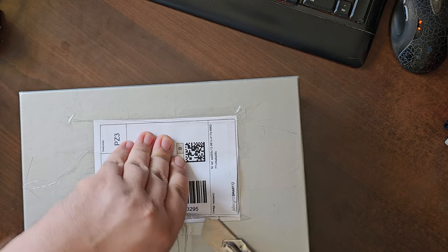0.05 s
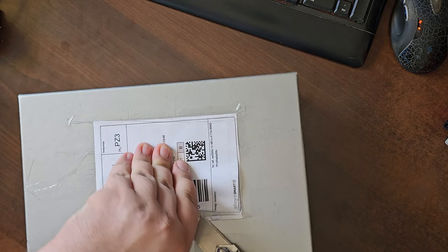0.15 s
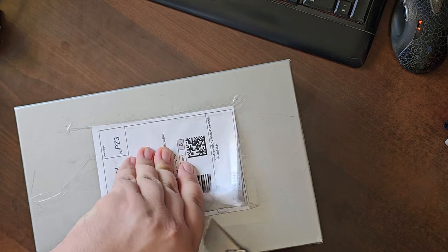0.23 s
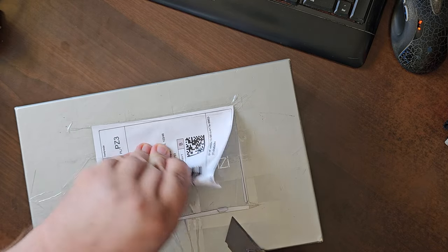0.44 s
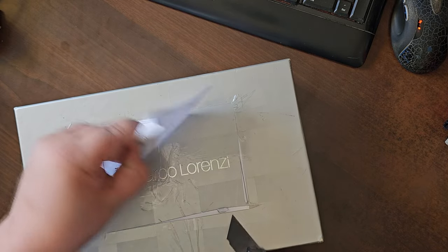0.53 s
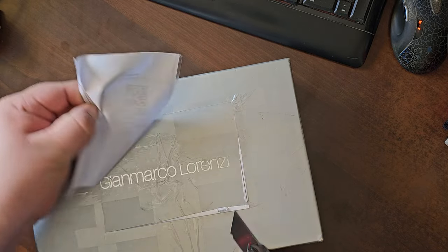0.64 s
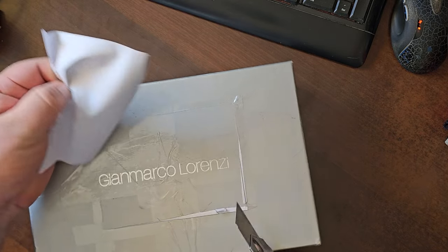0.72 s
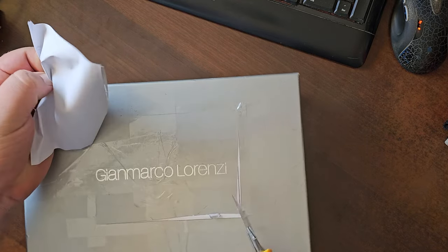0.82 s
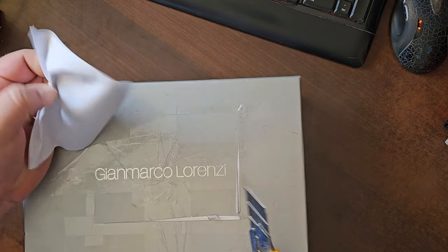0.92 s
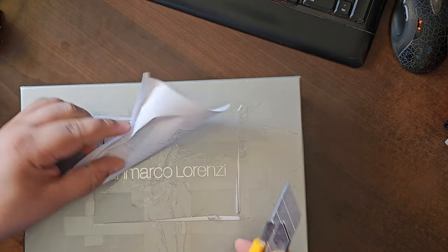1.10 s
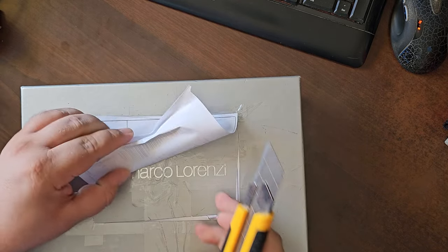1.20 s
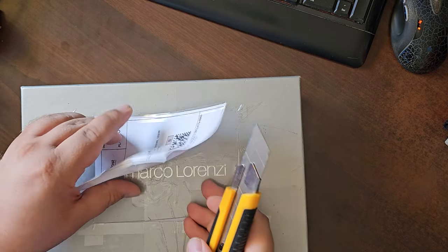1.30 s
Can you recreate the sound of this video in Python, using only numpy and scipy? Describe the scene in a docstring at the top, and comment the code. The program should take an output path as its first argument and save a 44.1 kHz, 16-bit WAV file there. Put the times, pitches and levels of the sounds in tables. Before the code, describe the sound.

A sticky paper label rips off a hollow cardboard box in quick, crackling snaps, close up

```python
"""Peeling a label off a cardboard box

A sticky paper label comes off a box on a desk, close under a small stereo microphone. The glue lets go
in sharp snaps: noise bursts that ring the stiff paper, each with a bright tick. Knocks thud on the hollow
box as a sum of decaying modes; the sheet rustles and crackles as random grains through paper, fizz and box.
A small room answers with a sparse decaying tail, over a quiet floor of noise with low rumble."""
import sys
import numpy as np
from scipy import signal
from scipy.fft import rfft, irfft
from scipy.io import wavfile

SR = 44100
rng = np.random.default_rng(int(sys.argv[2]) if len(sys.argv) > 2 else 0)


def magnitude_from_level(level_db):
    """Linear magnitude for a level in decibels (20 dB per decade)."""
    exponent = np.asarray(level_db, float) / 20
    return 10 ** exponent


def master(y):
    """Save y as 16-bit WAV."""
    cut = np.clip(np.atleast_2d(y).T, -1, 1)
    pcm = np.round(cut * 32767)  # scale
    wavfile.write(sys.argv[1], SR, pcm.astype(np.int16))


N = 59535  # samples

# spectrum of the sheet's middle voice: f/Hz, level/dB
PAPER_VOICE = [(290, -50.5), (500, -21.5), (850, -14.5), (1150, -14), (1200, -5.5), (1470, -10.5),
               (2380, -9.5), (3960, -6), (6000, -13), (7800, -17.5), (13200, -120)]
# spectrum of the sheet's treble: f/Hz, level/dB
FIZZ_VOICE = [(400, -56), (2000, -33), (3800, -6), (6500, -2.5), (10500, -1), (13500, -1.5), (15500, -6),
              (16500, -9)]
BALANCE_DB = 1.5  # left over right, for the knocks and the floor


def evened(x):
    """Scales a signal to an rms of 1."""
    return x / np.sqrt(np.mean(x ** 2) + 1e-20)


def peak(x):
    """Scales a signal to a peak of 1."""
    return x / abs(x).max()


def read(points, hz):
    """Reads a curve of (f/Hz, value) points along a logarithmic frequency axis."""
    f, value = np.transpose(points)
    return np.interp(np.log(hz + 1), np.log(f + 1), value)


def left_right(difference):
    """Splits a left-minus-right difference evenly over the two ports."""
    return np.array([[difference], [-difference]]) / 2


def place(x, pan_db, lag):
    """Two microphone ports: a level difference and a small delay in samples, on top of 8 for both."""
    n = len(x) + 32
    turn = np.exp(-2j * np.pi * np.fft.rfftfreq(n) * (8 + left_right(lag)))
    return irfft(rfft(x, n) * turn, n) * magnitude_from_level(left_right(pan_db))


def colour(points):
    """Causal filter of energy 1 with the given spectrum, its phase derived from the log gain."""
    level_db = np.maximum(read(points, abs(np.fft.fftfreq(2048, 1 / SR))), -60)
    log_gain = np.log(magnitude_from_level(level_db))
    taps = np.fft.ifft(np.exp(np.conj(signal.hilbert(log_gain)))).real[:1024]
    starts_strong = abs(taps[:50]).sum() > abs(taps[-50:]).sum()
    taps = taps if starts_strong else taps[::-1]
    return taps / np.linalg.norm(taps)


def snaps():
    """Each snap of glue or creasing paper: a short burst rings one patch of paper, with a bright tick."""
    # breaks of the glue and creases: t/s, length/ms, ring level/dB, ring f/Hz, tick level/dB
    breaks = [(0.059, 6.4, -41, 1220, -40), (0.135, 5.5, -43, 1300, -34), (0.2255, 3.5, -22, 2880, -44),
              (0.2316, 0.33, -17, 1290, -8), (0.2325, 0.34, -23, 2820, -2.5),
              (0.234, 2.33, -17, 2720, -8.5), (0.242, 2.2, -18.5, 4370.0, -30),
              (0.407, 2.4, -22, 1550, -23), (0.4112, 0.67, -12, 3300, -9), (0.4193, 0.21, -14, 1310, 6),
              (0.4212, 0.95, -18.5, 1670, -1.5), (0.4268, 0.88, -18.5, 3340, -32),
              (0.441, 2.7, -24, 960, -29), (0.4747, 2.4, -17, 3150, -23), (0.4901, 1.54, -18, 900, -45),
              (0.504, 6.7, -25, 1140, -20), (0.5793, 1.5, -23, 2590, -23), (0.5997, 1.7, -17.5, 1720, -44),
              (0.6021, 0.87, -15.5, 1740, -14), (0.6143, 1.5, -23, 1750, -21), (0.6257, 1, -13, 1700, -9),
              (0.6305, 0.44, -13, 1570.0, -22), (0.641, 0.74, -16.5, 1900, -9),
              (0.6456, 0.6, -13, 1530, -6), (0.6514, 0.33, -9, 1540, -2), (0.653, 3, -23, 1440, -15),
              (0.6533, 0.72, -12, 1410, -7), (0.658, 0.72, -10.5, 1580, -1.5), (0.6605, 0.7, -9, 3520, -6),
              (0.678, 1.4, -18, 1450, -12), (0.7155, 0.85, -12, 1470, -35.5), (0.7186, 1.7, -28, 2080, -12),
              (0.7259, 0.93, -23, 2390.0, -11.5), (0.7515, 2, -34, 1300, -46), (0.783, 3.5, -27, 4560, -25),
              (0.89, 7.6, -33, 1300, -41), (0.916, 4.2, -24, 1330, -36), (0.921, 6.5, -28, 1970, -36),
              (0.945, 4.6, -28.5, 1160.0, -50), (0.978, 3.7, -32, 2920, -37), (1.017, 2.9, -43, 920, -66),
              (1.046, 12, -32, 833, -54), (1.063, 6.3, -31.5, 1480, -37), (1.098, 3.2, -29.5, 1610.0, -46),
              (1.251, 2.6, -28, 1265, -39), (1.272, 2.7, -35, 1580, -47.5), (1.283, 2.5, -33.5, 1710, -32),
              (1.3287, 1.6, -38.5, 905, -48)]
    rise_share, release = 0.067, 2.74  # rise as a share of the length; strength of the first break
    ring_q, wide_db = 5.9, -1.5  # resonance of the patch; whole-sheet colour against the ring
    pan_db, pan_spread_db, lag_spread = 0.7, 1.1, 2.81  # lag in samples
    out, t = np.zeros((2, N + 1000)), np.arange(800) / SR
    paper, fizz = colour(PAPER_VOICE), colour(FIZZ_VOICE)
    for s, ms, ring_db, hz, tick_db in breaks:
        burst, tick, spread = rng.standard_normal((3, 800))
        u = t * 1e3 / ms
        shape = np.minimum(u / rise_share, 1) * np.exp(-u ** 2)
        # a one-sided push of about 0.1 ms as the glue lets go
        first_break = release / max(ms, .4) * np.exp(-(t / 0.0001) ** 2)
        burst = (burst - first_break / np.maximum(shape, .1)) * shape
        # two-pole resonator
        r = np.exp(-np.pi * hz / ring_q / SR)
        ring = signal.lfilter([1, 0, -1], [1, -2 * r * np.cos(2 * np.pi * hz / SR), r * r], burst)
        wide = peak(np.convolve(burst, paper)[:800])
        sound = magnitude_from_level(ring_db) * peak(peak(ring) + magnitude_from_level(wide_db) * wide)
        sound = sound + magnitude_from_level(tick_db) * peak(np.convolve(tick * shape, fizz)[:800])
        pan = pan_db + pan_spread_db * spread[0]
        both = place(sound, pan, lag_spread * np.clip(spread[1], -2, 2))
        out[:, round(s * SR) - 8:][:, :832] += both
    return out[:, :N]


def box_ring():
    """The hollow box answering a push at some random spot: decaying modes, energy 1."""
    # modes of the box: f/Hz, level/dB, t60/s
    modes = [(169, -3, 0.036), (245, -2, .03), (325.6, -0.5, .03), (419, -3.5, 0.034), (502.3, 0.5, 0.028),
             (632, -1, 0.023), (792, -2.5, 0.024)]
    low_hz = 120  # little of the box sounds below this
    spot_spread_db = 5.5  # where the lid is pushed changes which modes speak
    t, ring = np.arange(4000) / SR, np.zeros(4000)
    for k, (hz, db, t60) in enumerate(modes):
        spot_db = spot_spread_db * rng.standard_normal()
        decay = magnitude_from_level(db + spot_db - 60 * t / t60)
        ring += decay * np.sin(2 * np.pi * hz * t) * (-1) ** k
    ring = signal.sosfilt(signal.butter(3, low_hz, "high", fs=SR, output="sos"), ring)
    return ring / np.linalg.norm(ring)


def knocks():
    """Each jerk of the label pushes the lid and the box thuds."""
    # jerks on the lid: t/s, peak level/dB
    jerks = [(0.059, -39.5), (0.2304, -22), (.238, -42), (0.409, -33), (0.414, -26.5), (.427, -49),
             (0.492, -24.5), (.497, -31.5), (0.509, -52), (0.542, -30), (0.58, -24), (.600, -31),
             (.612, -31.5), (.626, -28), (.640, -24), (.660, -32), (0.678, -32.5), (0.715, -37),
             (0.784, -31.5), (0.891, -40), (.922, -34), (1.046, -43), (1.329, -33)]
    push_s = 0.00032  # time from the start of a push to its crest
    out, t = np.zeros(N + 5000), np.arange(300) / SR
    for s, db in jerks:
        push = (1 + .5 * rng.standard_normal(300)) * t * np.exp(-t / push_s)
        thud = peak(signal.fftconvolve(push, box_ring()))
        out[round(s * SR):][:4299] -= magnitude_from_level(db) * thud
    return out[:N] * magnitude_from_level(left_right(BALANCE_DB))


def rustle():
    """Clumps of tiny cracks from several spots of the sheet over a fine scrape, as paper, fizz and box."""
    # course of the crackle: t/s, level/dB, treble share/dB, box share/dB
    course = [(0.0, -46, -15, 0.5), (0.052, -60.5, 10.5, 1.5), (0.214, -54, -3, 3), (0.232, -28.5, -8, 0),
              (0.254, -43, 7, -3.5), (0.296, -57.5, 4, 1), (0.372, -49.5, -11.5, -3),
              (0.398, -66.5, 14.5, -2), (0.408, -32.5, -2, 7), (0.42, -28, 7.5, -5),
              (0.438, -29.5, -4, -13), (0.466, -37.5, 3, -1), (0.476, -30.5, -17, -6.5),
              (0.5, -35, -5, 0.5), (0.566, -40.5, -6, 2.5), (0.578, -29, -19, -12), (0.594, -48, -6, 1),
              (0.6, -28.5, -4, 0.5), (0.62, -38.5, 0, -5), (0.626, -28, -4, -20), (0.638, -24.5, -5, -11),
              (0.654, -18, -2, -12), (0.698, -40, -16, -8), (0.714, -30, -1.5, -5), (0.77, -54.5, -2.5, -1),
              (0.784, -39, -8, -4.5), (0.796, -51, -6, 3.5), (0.848, -70, -4, 4), (0.902, -37, -4.5, -5.5),
              (0.924, -43, -6, -20), (0.928, -43.5, -7, -1), (1.006, -56.5, -6.5, -8),
              (1.036, -52.5, -30.5, 9), (1.048, -38, -8.5, -6.5), (1.086, -52.5, 0, -1),
              (1.098, -42.5, -9.5, -7.5), (1.12, -50.5, -0.5, 0.5), (1.18, -63.5, -9, 6.5),
              (1.236, -52, -3, -1.5), (1.254, -35.5, -22, -27), (1.266, -57, -16, 11),
              (1.282, -36, -8.5, -13), (1.318, -63, -1, -13), (1.35, -50.5, 6, 1)]
    # parts of the sheet: left-right level/dB, lag/samples, ring f/Hz, ring level/dB
    spots = [(2.5, -4.5, 1430, -1.5), (-1, 3, 1750, -10), (-0.5, 5.5, 3420, -10), (2., -1.5, 2440, -2)]
    spot_q, clump_db, clump_s = 5.1, 4.5, 0.0052  # ring of a spot; rms swing and time constant of clumps
    grains_per_s, grain_spread_db, scrape_db = 3000, 3.5, -2  # scrape against the grains
    s, level_db, fizz_db, box_db = np.transpose(course)
    out, t = np.zeros((2, N)), np.arange(1024) / SR

    def along(db):
        """Gain over time from levels at the course's times."""
        return magnitude_from_level(np.interp(np.arange(N) / SR, s, db))

    for pan_db, lag, hz, ring_db in spots:
        ring = np.sin(2 * np.pi * hz * t) * np.exp(-np.pi * hz / spot_q * t)
        paper = colour(PAPER_VOICE) + magnitude_from_level(ring_db) * ring / np.linalg.norm(ring)
        paper = paper / np.linalg.norm(paper)
        slow = signal.lfilter([1], [1, -np.exp(-1 / (clump_s * SR))], rng.standard_normal(N))
        clump = magnitude_from_level(clump_db * evened(slow))
        happens = rng.random(N) < grains_per_s / SR
        size = magnitude_from_level(grain_spread_db * np.minimum(rng.exponential(1, N), 4)) * happens
        voices = [(level_db, paper), (level_db + fizz_db, colour(FIZZ_VOICE)), (level_db + box_db, box_ring())]
        spot = np.zeros(N)
        for db, body in voices:
            # same grain times and sizes for each voice, fresh noise
            grains = evened(size * rng.standard_normal(N))
            scrape = magnitude_from_level(scrape_db) * rng.standard_normal(N)
            drive = evened(clump * (grains + scrape))
            spot += signal.oaconvolve(drive * along(db), body)[:N]
        out += place(spot, pan_db, lag)[:, 8:N + 8] / np.sqrt(len(spots))
    return out


def room(x):
    """The small room's answer: sparse taps of random sign, each band dying at its own speed."""
    # decay of the room: f/Hz, t60/s
    decay = [(200, 0.16), (530, 0.095), (1400, 0.19), (3700, 0.2), (9700, 0.12)]
    room_db, mono_hz = -8, 420  # the ports hear the room alike below mono_hz
    taps = np.zeros((2, 16000))
    at = np.arange(60, 15980, 20) + rng.integers(0, 20, (2, 796))
    np.put_along_axis(taps, at, rng.choice([-1., 1.], at.shape), 1)
    hz, t, z = signal.stft(taps, SR, nperseg=128)
    same = 1 / (1 + (hz[:, None] / mono_hz) ** 2)
    z = np.array([z[0], same * z[0] + np.sqrt(1 - same ** 2) * z[1]])
    fade = magnitude_from_level(-60 * t / read(decay, hz)[:, None])
    tail = signal.istft(z * fade, SR, nperseg=128)[1]
    tail = tail / np.linalg.norm(tail[0])
    return magnitude_from_level(room_db) * signal.fftconvolve(x, tail, axes=1)[:, :N]


def floor():
    """Steady room hiss and rumble: shaped random spectra, alike in both ports in the bass."""
    # spectrum of the floor: f/Hz, relative level/dB
    spectrum = [(15, -37), (27, -27), (42, 0.5), (56, -1), (78, -13), (100, -1.5), (140, -14.5), (320, -20),
                (700, -21), (1600, -27.5), (4500, -36.5), (9000, -43), (15500, -44), (16500, -45)]
    # left-right likeness: f/Hz, correlation (1 = alike)
    likeness = [(60, 1), (240, 0.69), (950, 0.23), (3770, 0.078), (15000, 0.039)]
    floor_db = -47  # rms, before the balance
    frames, hz = N // 512 + 5, np.fft.rfftfreq(2048, 1 / SR)
    a, b, c, d = rng.standard_normal((frames, 1025, 4)).T
    left, other = a + 1j * b, c + 1j * d
    same = np.clip(read(likeness, hz), -1, 1)[:, None]
    right = same * left + np.sqrt(1 - same ** 2) * other
    z = np.array([left, right]) * magnitude_from_level(read(spectrum, hz))[:, None]
    noise = signal.istft(z, nperseg=2048, noverlap=1536)[1][:, :N]
    return magnitude_from_level(floor_db + left_right(BALANCE_DB)) * evened(noise)


def scene():
    """The label's snaps, knocks and rustle, answered by the room, over the floor."""
    label = snaps() + knocks() + rustle()
    return label + room(label) + floor()


def band_limit(x):
    """A steep low-pass at the top of the band."""
    return signal.sosfilt(signal.butter(12, 16980, fs=SR, output="sos"), x)


def record(dry):
    """Port balance in the treble, soft overload of the input, then a band limit."""
    treble_left_db, ceiling, edge_hz = 1.5, .9, 15800  # the left port hears more treble
    treble = signal.sosfiltfilt(signal.butter(2, 7000, "high", fs=SR, output="sos"), dry)
    heard = dry + treble * (magnitude_from_level(left_right(treble_left_db)) - 1)
    overloaded = ceiling * np.tanh(heard / ceiling)
    edge = signal.firwin(255, edge_hz, window=("kaiser", 7), fs=SR)
    return band_limit(signal.oaconvolve(overloaded, edge[None], "same"))


dry = scene()
out = record(dry)
master(out)
```